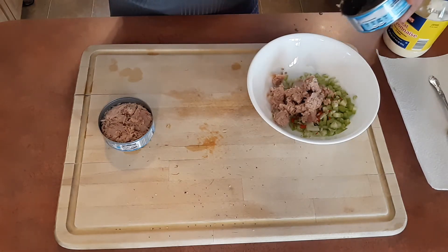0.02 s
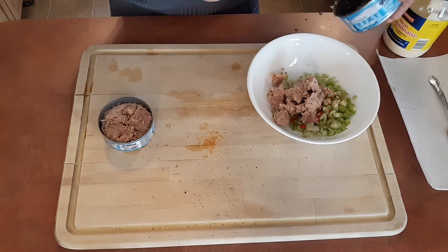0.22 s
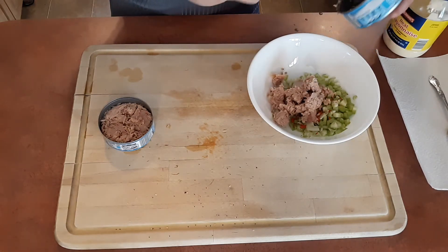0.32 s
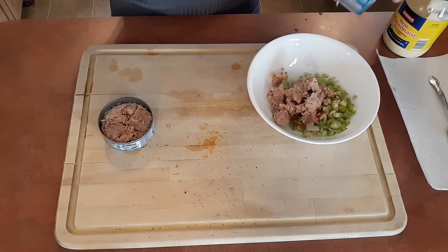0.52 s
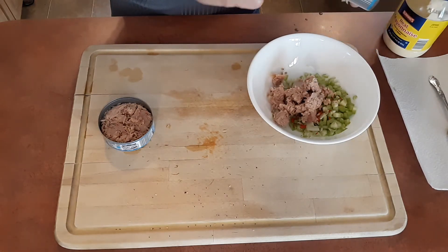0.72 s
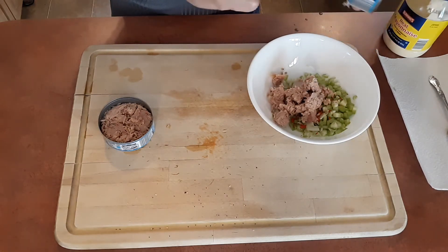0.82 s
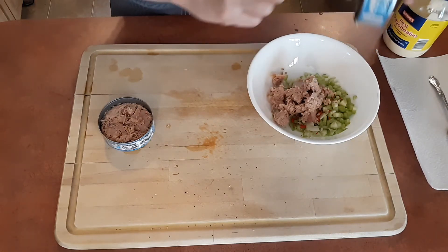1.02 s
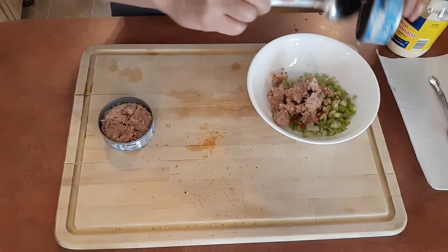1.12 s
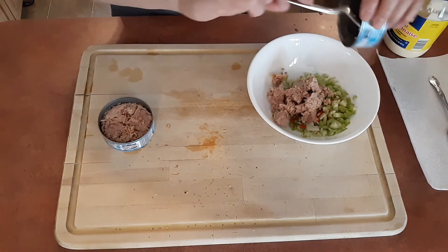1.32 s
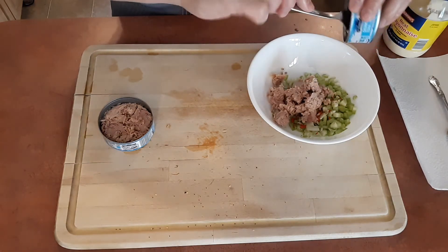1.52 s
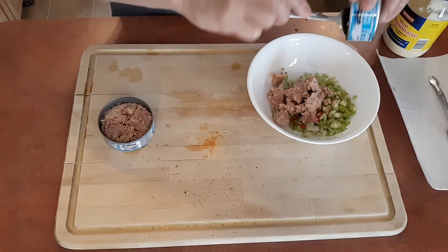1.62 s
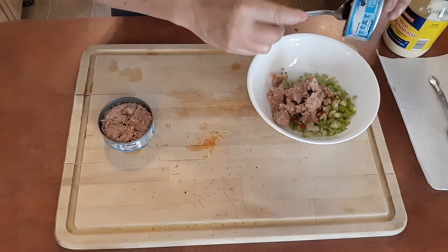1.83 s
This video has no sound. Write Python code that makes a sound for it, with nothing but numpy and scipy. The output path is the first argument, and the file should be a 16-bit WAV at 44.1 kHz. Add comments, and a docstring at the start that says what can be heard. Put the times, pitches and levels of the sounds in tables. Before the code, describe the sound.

A metal spoon clinks and scrapes inside a hand-held can, with quick, damped knocks and short rasps, one slightly squeaky. It is close and a little to the right, in a small kitchen with a faint appliance hum.

```python
"""A steel spoon digs the last tuna out of a hand-held can, over a bowl in a small kitchen.
Its edge sticks and slips along the thin wall in short, rasping strokes that can squeal.
Its knocks ring the metal over a brief clatter, and the hand damps the rings quickly.
The hard room carries each sound on; beneath lie a soft rustle, room air and a faint appliance hum."""
import sys
import numpy as np
from scipy import signal
from scipy.fft import rfft, irfft, next_fast_len
from scipy.io import wavfile
from scipy.ndimage import map_coordinates

SR = 44100
rng = np.random.default_rng(int(sys.argv[2]) if len(sys.argv) > 2 else 0)


def generate_wav(sig):
    """Save sig (samples, or channels by samples) to the path in sys.argv[1] as 16-bit PCM at SR."""
    pcm = np.round(np.clip(np.atleast_2d(sig).T, -1, 1) * 32767).astype(np.int16)
    wavfile.write(sys.argv[1], SR, pcm)


N = 83790
TIME = np.arange(N) / SR
EDGES = np.geomspace(25, 18000, 24)
CENTRES = np.sqrt(EDGES[1:] * EDGES[:-1])
BANK = [signal.butter(2, pair, "band", fs=SR, output="sos") for pair in zip(EDGES, EDGES[1:])]


def from_db(db):
    """Decibels to gain."""
    return 10 ** (np.asarray(db) / 20)


def rms_one(x):
    """Scale to unit rms."""
    return x / np.sqrt(np.mean(x ** 2) + 1e-20)


def at_hz(points, hz):
    """Read a curve on a log-frequency axis."""
    freqs, values = np.transpose(points)
    return np.interp(np.log(hz), np.log(freqs), values)


def drift(rate):
    """A smooth random wobble of unit rms, through `rate` points a second."""
    return rms_one(map_coordinates(rng.standard_normal(4096), [TIME * rate], order=3, mode="wrap"))


def panned(db):
    """Constant-power gains, with the left `db` above the right."""
    return rms_one(from_db([[db / 2], [-db / 2]]))


def equalise(x, gains):
    """A minimum-phase EQ with one gain per band."""
    size = 2 * next_fast_len(x.shape[-1])
    cepstrum = irfft(np.interp(np.arange(size // 2 + 1) * SR / size, CENTRES, np.log(gains)))
    cepstrum[1:size // 2] *= 2
    cepstrum[size // 2 + 1:] = 0
    return irfft(rfft(x, size) * np.exp(rfft(cepstrum)))[..., :x.shape[-1]]


# The stereo image. Each row: frequency in Hz, left over right in dB.
PAN = [(200, 4.5), (700, 3.5), (1400, -4), (2800, 6.5), (4200, -3.5), (6300, -9.5), (8000, 1),
       (11000, -13.5), (15000, -9.5)]
def placed(x, share):
    """The can is off to the right, so the left side loses treble."""
    gains = np.hstack([panned(share * at_hz(PAN, hz)) for hz in CENTRES])
    return np.array([equalise(side, g) for side, g in zip(x, gains)])


# The hiss of the slips. Each row: frequency in Hz, EQ gain in dB.
SLIP_EQ = [(100, -35), (500, -27), (1300, -9.5), (3000, 0), (7000, 5), (12000, 2), (16000, -1)]
# The wall's resonances. Each row: centre in Hz, width in Hz, gain in dB.
WALL_RESONANCES = [(711, 17, 12), (1123, 90, 3.5), (1930, 43, 10.5), (2550, 110, -3), (3470, 350, 9.5),
                   (3970, 290, 11), (4540, 200, -1), (6600, 700, -20.5), (8500, 520, -6)]
def edge_rasp(slips_per_s=3200, spread_db=2.5):
    """The edge sticks and slips, firing dense, uneven clicks into the wall's resonances."""
    slips = (rng.random(N) < slips_per_s / SR) * rng.choice([-1, 1], N)
    slips = slips * from_db(spread_db * np.minimum(rng.exponential(1, N), 4))
    rasp = equalise(slips, from_db(at_hz(SLIP_EQ, CENTRES)))
    for hz, width, db in WALL_RESONANCES:
        r = np.exp(-np.pi * width / SR)
        feedback = [1, -2 * r * np.cos(2 * np.pi * hz / SR), r * r]
        rasp += from_db(db) * (1 - r * r) / 2 * signal.lfilter([1, 0, -1], feedback, slips)
    return rms_one(rasp)


# The rubbed modes. Each row: pitch in Hz, width in Hz, relative level in dB.
RUBBED_MODES = [(1915, 50, -1.5), (4080, 88, -2.5)]
def rubbed_ring():
    """Rubbing feeds two modes at random and keeps them ringing."""
    ring = 0
    for hz, width, db in RUBBED_MODES:
        drive = drift(2 * width) + 1j * drift(2 * width)
        ring += from_db(db) * np.real(drive * np.exp(2j * np.pi * hz * TIME))
    return rms_one(ring)


def squeal(hz, jitter_hz=90):
    """The wall sings unsteadily under the sliding edge."""
    return np.sqrt(2) * np.sin(2 * np.pi * np.cumsum(hz + jitter_hz * drift(500)) / SR)


# The spoon's strokes. Each row: start, length and attack in seconds, then opening level,
# closing level, treble lift, squeal, ring and unevenness, all in dB.
STROKES = [(0.0, 0.039, 0.00081, -34.5, -52.5, -4, -11.5, -33, 2.5),
           (0.015, 0.031, 0.0035, -50, -61.5, -8, -5, -15, 3.5),
           (0.192, 0.057, 0.0032, -42, -28, -0.5, -38, -25, 4.5),
           (0.729, 0.061, .02, -68, -66.5, 5, -23, -13, -0.5),
           (1.231, 0.074, .004, -43.5, -31, -8.5, -4.5, -16.5, 1.5),
           (1.322, 0.03, 0.0032, -37, -30.5, -11, -24, -10, -3),
           (1.62, 0.0374, 0.021, -59, -49.5, 2.5, -23, -1.5, -0.7),
           (1.71, 0.087, 0.028, -61, -63, 6, -23, -6.5, -2.2),
           (1.815, 0.075, 0.023, -64.5, -71, 2, -22, -17.5, -3)]
def scrapes(release_s=0.004, squeal_hz=4520, overtone_hz=8400, sag_hz_per_s=1700):
    """Each stroke along the wall blends rasp, ring and a sagging squeal."""
    rasp, ring = edge_rasp(), rubbed_ring()
    catches = drift(190)   # the edge catches and frees itself
    treble = signal.sosfilt(signal.butter(1, 6000, "high", fs=SR, output="sos"), rasp)
    out = 0
    for start, length, attack, open_db, close_db, treble_db, squeal_db, ring_db, uneven_db in STROKES:
        t = TIME - start
        pressure = np.clip(t / attack, 0, 1) * np.exp(-np.maximum(t - length, 0) / release_s)
        level = from_db(np.interp(t, [0, length], [open_db, close_db]) + uneven_db * catches)
        sag = sag_hz_per_s * np.clip(t, 0, length)
        song = squeal(squeal_hz - sag) + from_db(-6.5) * squeal(overtone_hz - sag)
        grit = rasp + (from_db(treble_db) - 1) * treble
        out += pressure * level * (grit + from_db(squeal_db) * song + from_db(ring_db) * ring)
    return out


# The rustle's fader. Each row: time in seconds, level in dB.
RUSTLE_FADER = [(0, -72), (.25, -89), (.55, -69.5), (.8, -70), (1.0, -81.5), (1.9, -78)]
def rustle(band_hz=(180, 567)):
    """A soft, low rustle, strongest in the first second."""
    noise = signal.sosfilt(signal.butter(3, band_hz, "band", fs=SR, output="sos"), rng.standard_normal(N))
    return rms_one(noise) * from_db(np.interp(TIME, *np.transpose(RUSTLE_FADER)))


# The room's stereo width. Each row: frequency in Hz, left-right correlation (1 is mono).
ROOM_CORRELATION = [(100, 0.8), (700, 0.28), (1500, 0.0041), (3000, 0), (16000, 0.071)]
def diffuse_bands():
    """Bands of stereo noise, alike on both sides only in the bass."""
    for sos, hz in zip(BANK, CENTRES):
        mid, side = signal.sosfilt(sos, rng.standard_normal((2, N)))
        alike = at_hz(ROOM_CORRELATION, hz)
        yield hz, np.sqrt((1 + alike) / 2) * mid + np.sqrt((1 - alike) / 2) * side * [[1], [-1]]


# The room tone. Each row: frequency in Hz, EQ gain in dB.
AIR_EQ = [(25, -18), (60, -8.5), (150, -2.5), (450, -16.5), (700, -22), (1250, -15.5), (2000, -29.5),
          (3000, -32), (5000, -21), (8000, -20.5), (16000, -25.5)]
def room_air(level_db=-70.5):
    """A steady, dark bed of diffuse noise."""
    air = sum(from_db(at_hz(AIR_EQ, hz)) * noise for hz, noise in diffuse_bands())
    return from_db(level_db) * rms_one(air)


# The appliance's tones. Each row: pitch in Hz, level in dB.
HUM_TONES = [(59.2, -81.5), (110.5, -71.5), (257.5, -74), (441, -85.5)]
def appliance_hum(waver_depth=0.083):
    """An appliance hums on four low tones, each wavering in level."""
    hum = 0
    for hz, db in HUM_TONES:
        waver = 1 + waver_depth * drift(11.9)
        tone = np.sqrt(2) * np.sin(2 * np.pi * (hz * TIME + rng.random()))
        hum += panned(at_hz(PAN, hz)) * from_db(db) * waver * tone
    return hum


# The spoon's hits, plus one weak early echo off the room at 0.4995 s. Each row: start in seconds,
# kind of contact, level in dB, then trims in dB for thud, bass, ping, top and clatter.
KNOCKS_AND_ECHO = [(0.194, "glance", -33, 0, -14.5, 5.5, -8, -18),
                   (0.2325, "bottom", -16, 3.5, -3, -6.5, 4.5, -4),
                   (0.2425, "bottom", -25, 10.5, -0.5, 1.5, -15, -7),
                   (0.4773, "rim", -26, 2.5, 6.5, 5, -15, -8), (0.4808, "rim", -30, 5.5, -8, 5, 2, 6),
                   (0.4995, "rim", -33.5, 7.5, 8, -6.5, 1, -3),
                   (0.9007, "rim", -34.5, -7.5, -5, -10.5, -12.5, -11),
                   (0.9248, "rim", -22, -3, 2, 1.5, -7, -2.5),
                   (0.9382, "rim", -24.5, -2.5, -1.5, -1.5, -4, 9),
                   (1.2347, "glance", -32, -24, -8, 10.5, 10.5, -1),
                   (1.3197, "wall", -28, -21, -3.5, 1.5, 2.5, 2.5),
                   (1.337, "wall", -39, 5, 0.5, -0.5, -25, 11.5),
                   (1.362, "wall", -34.5, 11, 5.5, 11.5, -5, 2.5),
                   (1.3663, "wall", -35.5, 8, 2, -0.5, -1, 9.5),
                   (1.643, "touch", -53, -12, -13, 6, -4.5, -2),
                   (1.658, "touch", -47, -4, -3.5, -4.5, -7.5, -12.5),
                   (1.778, "touch", -60, -15, -3, 11.5, -18, -3.5)]
# The kinds of contact: bottom, rim, wall, glance, touch.
CONTACTS = ["bottom", "rim", "wall", "glance", "touch"]
# The modes of can and spoon. Each row: pitch in Hz, seconds to fade by 60 dB, left over right in dB,
# then a relative level in dB for each kind of contact.
METAL_MODES = [(378.6, 0.12, 0, -23.5, -16.5, -34, -28, -27),
               (568, .06, -0.5, -33, -27.5, -4, -30.5, -17.5), (696.2, 0.12, 0, -3.5, -7.5, -4, -5, -14),
               (796, 0.034, -3, -8.5, -28, -1, -25.5, -33), (1128, 0.15, 6, -16, -19, -17.5, -13, -33),
               (1343, 0.055, 2, -30.5, -20, -9.5, -17.5, -10), (1673, 0.072, 4, -13.5, -13, -7, -15.5, -18),
               (1869, .1, 2, -3, -5.5, -0.5, -11.5, 0.5), (1974, 0.071, 1.5, -2, -8.5, -13, -26, -5),
               (2494, 0.058, 16.5, -6, -2, -5.5, -14.5, -14.5),
               (2655, 0.062, -17, -3, -15.5, -4.5, -30, -16.5), (2850, 0.05, 1.5, -4, -32, -4, -22, -29.5),
               (3310, 0.12, -2.5, -10, -12, -14, -20, -41),
               (3580, 0.017, -4.5, -6.5, -24.5, -21, -6.5, -25), (3904, 0.03, -9, -2, 2.5, -2, -10, -21.5),
               (4070, .07, -26.5, -11.5, -6, -6.5, -8, -9.5), (4390, 0.02, -2.5, -25, -35, -14, 2.5, -24),
               (4980, 0.031, -0.5, 5.5, -1, -28, -14, -26),
               (5040, 0.037, -1.5, -18.5, -15.5, -3, -14, -2.5),
               (5730, 0.023, -15.5, -26.5, -13, -31, -11, -24), (6494, 0.032, -10.5, -3.5, 1, -14, -9, -22),
               (8200, 0.15, -2.5, -28, -9.5, -28, -13.5, -23.5), (8240, .04, 9.5, -18, -15, -24, -13, -25),
               (8730, 0.039, -6.5, -20, -21, -18, -0.5, -16), (11280, .07, -16, -14, -19, -32, -35, -24)]
# The thin sheet's dense, short modes. Each row: frequency in Hz, EQ gain in dB.
CLATTER_EQ = [(40, -29), (150, -22), (260, -6), (560, -6.5), (900, -2.5), (1500, 2.5), (2200, -1),
              (3000, -9), (4500, 1.5), (7000, -6.5), (10000, -3.5), (16000, -7.5)]
def knocks_and_echo(clatter_t60_s=0.029, spread_db=1.91, detune_share=0.0069):
    """Struck metal rings over a brief clatter; the one early echo is voiced the same way."""
    send, stereo = np.zeros(N + SR), np.zeros((2, N + SR))
    t = TIME[:SR // 4]
    for start, contact, db, thud_db, bass_db, ping_db, top_db, clatter_db in KNOCKS_AND_ECHO:
        span = slice(int(start * SR), int(start * SR) + len(t))
        eq = [(464, thud_db), (700, bass_db), (1520, 0), (2650, 0),
              (4000, ping_db), (7000, ping_db), (10200, top_db)]
        clatter = rms_one(equalise(rng.standard_normal(len(t)), from_db(at_hz(CLATTER_EQ, CENTRES))))
        clatter *= from_db(db + 2 + clatter_db - 60 * t / clatter_t60_s)
        clatter = equalise(clatter, from_db(at_hz(eq, CENTRES)))
        send[span] += clatter
        stereo[:, span] += placed([clatter, clatter], share=1)
        for k, (hz, t60, pan_db, *levels) in enumerate(METAL_MODES):
            strength, detune, skew = rng.standard_normal(3)   # no two rings are alike
            mode_db = db + levels[CONTACTS.index(contact)] + at_hz(eq, hz) + spread_db * strength
            attack = 1 - np.exp(-2 * hz * t)
            envelope = (-1) ** k * attack * from_db(mode_db - 60 * t / t60)
            phase = 2 * np.pi * hz * (1 + detune_share * detune) * t
            stereo_phase = min(hz / 2000, 1) * skew * np.array([[.5], [-.5]])
            send[span] += envelope * np.sin(phase)
            stereo[:, span] += panned(pan_db) * envelope * np.sin(phase + stereo_phase)
    return send[:N], stereo[:, :N]


# The reverb's length. Each row: frequency in Hz, seconds to fade by 60 dB.
REVERB_T60 = [(100, 0.42), (700, 0.33), (2000, 0.38), (5000, 0.35), (9000, 0.33), (16000, 0.19)]
# The reverb's colour. Each row: frequency in Hz, level against the direct sound in dB.
REVERB_EQ = [(100, -4.5), (700, -4.5), (2000, -4.5), (5000, -6.5), (9000, -4), (16000, -7)]
def kitchen_reverb(send, build_s=0.0017):
    """Dense echoes off hard walls build within milliseconds and die sooner in the treble."""
    echoes = 0
    for hz, noise in diffuse_bands():
        decay = from_db(-60 * TIME / at_hz(REVERB_T60, hz)) * (1 - np.exp(-TIME / build_s))
        echoes += from_db(at_hz(REVERB_EQ, hz)) * noise * decay / np.sqrt(np.sum(decay ** 2))
    return placed(signal.fftconvolve(send[None], echoes, axes=1)[:, :N], share=0.7)


def scene(left_lag_s=0.00013):
    """Spoon and can, slightly to the right, over the quiet of the kitchen."""
    metal_send, metal_stereo = knocks_and_echo()
    scraped = scrapes()
    left, right = metal_stereo + placed([scraped, scraped], share=0.92)
    close = np.array([np.interp(TIME - left_lag_s, TIME, left), right])
    return close + kitchen_reverb(metal_send + scraped) + rustle() + room_air() + appliance_hum()


def record(dry):
    """A steep low-pass cuts the top at 16 kHz."""
    return signal.sosfilt(signal.ellip(10, .2, 80, 16000, fs=SR, output="sos"), dry)


dry = scene()
out = record(dry)
generate_wav(out)
```